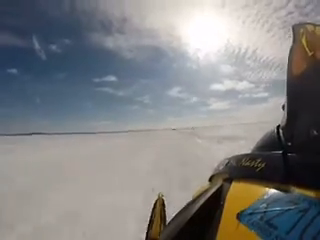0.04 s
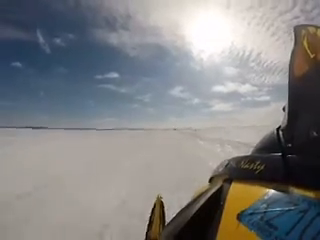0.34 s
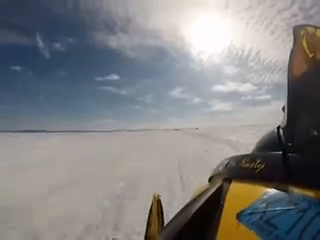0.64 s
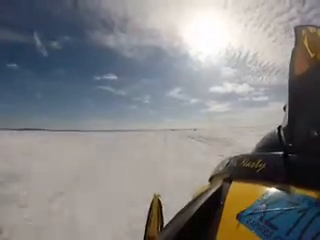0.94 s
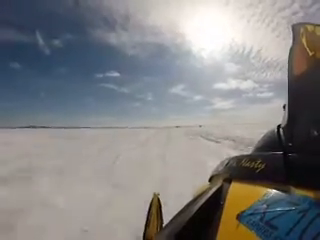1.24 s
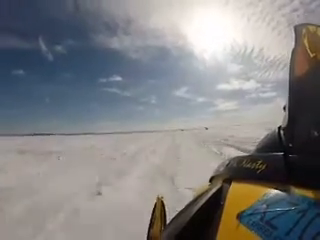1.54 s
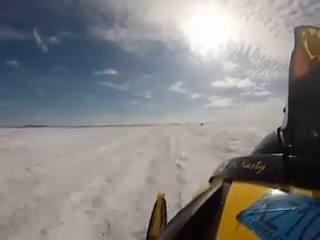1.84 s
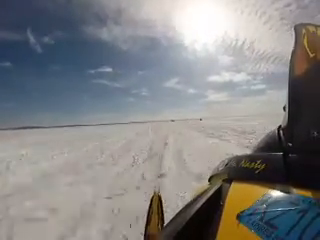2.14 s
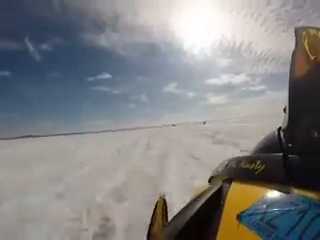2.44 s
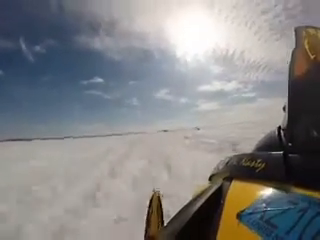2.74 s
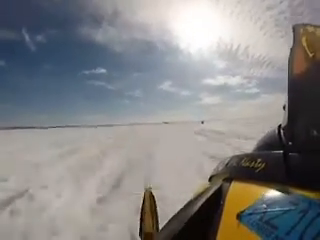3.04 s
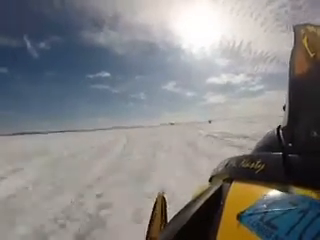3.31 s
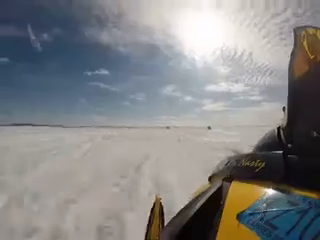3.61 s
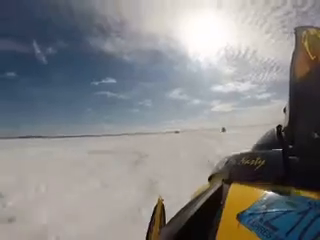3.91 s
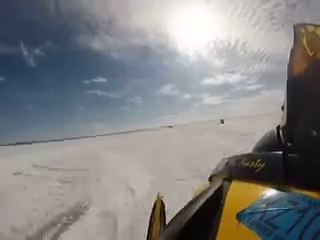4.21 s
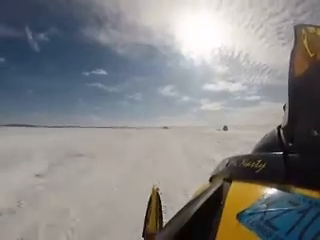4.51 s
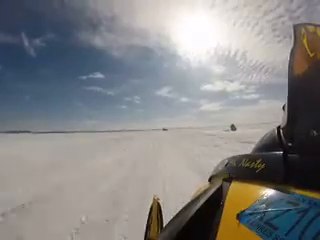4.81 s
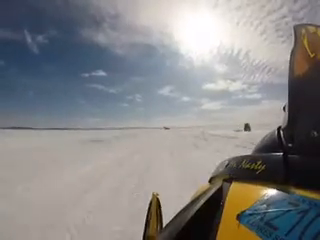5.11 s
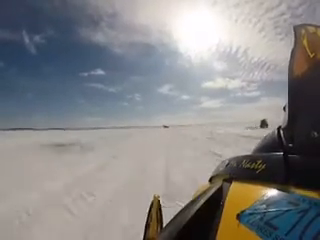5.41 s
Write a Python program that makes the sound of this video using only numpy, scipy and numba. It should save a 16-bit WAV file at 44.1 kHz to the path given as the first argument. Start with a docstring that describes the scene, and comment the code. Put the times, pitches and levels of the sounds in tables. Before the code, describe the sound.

Heard from on board, a fast snowmobile hums steadily through rumbling wind, spraying snow and rattling over drifts.

```python
"""Snowmobile over lake ice

A fast run on snow-covered ice, heard from a cased camera low on the sled's side. The twin-cylinder
engine drones under buffeting wind and beats against the track in the hood. Air rushes and rings in
the case, the skis kick up hissing snow and thud into drifts, ice ticks on the shell, and the mount
clacks over the rough stretches."""
import sys
import numpy as np
from scipy import signal
from scipy.fft import rfft, irfft, next_fast_len
from scipy.io import wavfile
from scipy.ndimage import uniform_filter1d
from numba import njit

SR = 44100
rng = np.random.default_rng(int(sys.argv[2]) if len(sys.argv) > 2 else 0)


def pcm_store(signal):
    """Save signal as 16-bit PCM."""
    levels = np.round(np.clip(np.atleast_2d(signal), -1, 1) * 32767)
    wavfile.write(sys.argv[1], SR, levels.astype(np.int16).T)


N = 249606
TIME = np.arange(N) / SR

# engine speed: time_s, firing_hz
ENGINE_SPEED = [(0.0, 146.4), (0.4, 152.8), (0.85, 144.9), (1.25, 147), (1.53, 149.7), (1.8, 143.3),
                (2.05, 145), (2.3, 141.9), (2.66, 151.1), (2.86, 151.5), (3.1, 147.6), (3.25, 153.4),
                (3.44, 149.1), (3.7, 151.4), (4.15, 147.4), (4.9, 152.3), (5.2, 148.4), (5.66, 134.7)]
# fader ride on the engine drone: time_s, level_db
DRONE_LEVEL = [(0.0, -30), (0.14, -14), (0.32, -25), (0.6, -19.5), (0.88, -22.5), (1.06, -18.8),
               (1.3, -24.5), (1.52, -18.5), (1.85, -22), (2.25, -28.5), (2.62, -20), (2.76, -26),
               (3.15, -25.5), (3.85, -18), (4.15, -25), (4.85, -17), (5.22, -17.5), (5.66, -35)]
# the drone's harmonics: crank_multiple, level_db
DRONE_ORDERS = [(1, -5), (2, 0.5), (3, -17.5), (4, -28.5), (5, -30), (6, -24.5)]
# how hard the hood shakes: time_s, level_db
HOOD_LEVEL = [(0.0, -20), (0.4, -17.5), (0.85, -25), (1.15, -20.5), (1.3, -31), (1.52, -15), (1.75, -23.5),
              (2.2, -21), (3.0, -21.5), (3.55, -26), (3.74, -15.5), (4.22, -26.5), (4.4, -18.5),
              (4.65, -24), (5.4, -19.5), (5.66, -27.0)]
# how far the track's lug rate runs above the third engine order: time_s, lead_hz
LUG_LEAD = [(0.0, 8.53), (0.4, 9.61), (0.75, 5.7), (1.3, 9.46), (1.75, 6.12), (2.05, 7.3), (2.5, 6.01),
            (2.8, 8.9), (3.3, 10.68), (3.7, 8.0), (4.0, 11.44), (4.35, 8.67), (5.05, 7.12), (5.3, 10.18),
            (5.66, 6.98)]
# the hood's broad resonance: frequency_hz, gain_db
HOOD_EQ = [(130, -48.5), (185, -16.5), (208, -2), (222, 2.5), (240, 0.5), (265, -9), (310, -34), (600, -55)]
# wind pressure on the case: time_s, level_db
BUFFET_LEVEL = [(0.0, -24), (0.4, -20), (0.85, -15), (1.05, -20), (1.28, -11), (1.47, -28), (1.6, -15.5),
                (2.3, -13.5), (2.95, -21), (3.15, -17.5), (3.6, -19.6), (4.05, -14.5), (4.28, -25),
                (4.5, -17), (4.8, -25.5), (5.25, -22.5), (5.52, -14), (5.66, -15)]
# deep rumble of the rocking case: frequency_hz, gain_db
BUFFET_EQ = [(12, -44), (25, 0.5), (36, 4.5), (43, 15), (51, 5), (62, -1), (90, -8.5), (200, -55)]
# the skis plough through loose snow: centre_s, length_s, rush_db, spray_db
SNOW_PUFFS = [(0.117, 0.031, -26, -39), (0.182, 0.054, -28.5, -39), (0.434, 0.056, -29.5, -53),
              (0.571, 0.17, -27, -37), (0.709, .04, -25.5, -38), (0.793, 0.025, -30.5, -33),
              (0.994, 0.11, -29.5, -56), (1.117, 0.051, -22.5, -32), (1.25, 0.057, -34.5, -36),
              (1.52, 0.1, -23.5, -38), (1.784, 0.042, -21, -34), (2.064, 0.031, -38, -35),
              (2.207, 0.067, -32.5, -38), (2.489, 0.038, -24.5, -41), (2.673, 0.056, -27, -42),
              (2.872, 0.023, -25.5, -35), (3.074, 0.13, -30.5, -47), (3.324, 0.02, -22, -41),
              (3.643, .05, -26.5, -37), (3.753, 0.15, -32, -50), (3.835, 0.095, -30, -36.5),
              (4.41, 0.044, -29, -39), (4.523, .06, -27, -36), (4.82, 0.17, -28.5, -33),
              (4.985, 0.11, -26.5, -37.5), (5.118, 0.037, -27, -41), (5.221, 0.069, -26, -36),
              (5.405, 0.049, -25, -37), (5.506, 0.12, -29, -41.5)]
# low flapping of the eddies: frequency_hz, gain_db
EDDY_EQ = [(30, -31), (70, -3.5), (125, 3.5), (175, -3.5), (280, -8), (340, -11.5), (430, -18), (560, -20),
           (800, -28), (1300, -19), (3000, -48)]
# hollow ring of the case's cavity: frequency_hz, gain_db
CASE_EQ = [(400, -3), (800, -35.5), (1000, -13), (1200, -3.5), (1530, 2), (1720, -1.5), (1900, -9.5),
           (2300, -13), (2660, -14.5), (2820, -15.5), (3500, -22), (5000, -29.5), (9000, -43)]
# hiss of flying snow: frequency_hz, gain_db
SPRAY_EQ = [(1500, 0.5), (2900, 7.5), (3700, -4.5), (4300, 0), (4900, 3.5), (5600, 0), (6250, 5),
            (7000, -6.5), (8000, -11.5), (9600, -12.5), (11200, -25), (12800, -29), (14500, -44),
            (16000, -49.5)]
# sheen of the gliding skis: frequency_hz, gain_db
GLIDE_EQ = [(1500, -15), (4000, -8.5), (6200, 0.5), (7500, -13), (9600, -8), (11000, -31), (12800, -29.5),
            (14000, -39)]
# the mount knocks in its play: start_s, peak_db, upper_modes_db
MOUNT_KNOCKS = [(0.0983, -14.5, 8), (0.4987, -7.5, -13), (0.597, -7.5, -5.5), (0.612, -13, 2),
                (1.021, -16.5, -5), (1.2458, -14.5, -4), (1.2893, -16.5, 5), (1.3507, -13.5, -8),
                (1.5769, -15.5, -2), (1.7954, -18, -3), (2.203, -18, -15), (2.2559, -19, 10),
                (2.2909, -20.5, 6), (2.3243, -6.5, -9), (2.3612, -8, -5.5), (2.5737, -9.5, -9.5),
                (2.5999, -13, -4), (2.6066, -9.5, -8), (2.8277, -10, -5), (2.8347, -15.5, 2),
                (3.0637, -15.5, -11), (3.1343, -8.5, -4.5), (3.1615, -15, -8), (3.4049, -12.5, 3),
                (3.451, -16, 9), (3.7644, -4.5, -5.5), (3.871, -1.5, -7.5), (3.9113, -3.5, -13.5),
                (3.9447, -9, -9), (4.033, -18, 9)]
# the mount's ringing modes: pitch_hz, level_db, t60_s
MOUNT_RING = [(1550, -2.5, 0.013), (2265, 1.5, 0.012), (2330, -13, 0.03), (2890, -15, 0.015),
              (3510, -13.5, 0.0081), (4100, -15, 0.0083)]
# the skis hit drifts: start_s, level_db
DRIFT_HITS = [(0.866, -15), (1.114, -13), (1.241, -14), (1.478, -20), (1.763, -23), (2.004, -19),
              (2.203, -14.5), (2.67, -9), (2.751, -17.5), (2.91, -17.5), (3.533, -16.5), (3.695, -12.5),
              (3.715, -10.5), (4.072, -20.5), (4.082, -8.5), (5.106, -25)]
# dull body of a ski slap: frequency_hz, gain_db
THUD_EQ = [(40, -31), (120, -4.5), (240, 5.5), (420, -0.5), (650, -17.5), (1200, -7), (2500, -20.5),
           (8000, -54)]
# chips of ice strike the case: start_s, level_db
CHIP_HITS = [(1.1927, -30), (1.3574, -39), (2.1375, -34), (2.4044, -31), (2.6654, -29), (2.7769, -34),
             (2.8634, -29), (2.9088, -33), (3.0644, -32), (3.178, -33), (3.3109, -30), (3.5324, -33),
             (3.9853, -29), (4.483, -34)]
# the hiss ducks briefly, deepest after a hard jolt: centre_s, length_s, depth_db
LEVEL_DIPS = [(0.04, 0.08, 0.5), (0.26, 0.022, 4), (0.92, 0.049, 2), (1.32, 0.076, 0), (1.668, 0.039, 1.5),
              (2.116, 0.051, 3), (2.728, 0.025, 6), (2.95, 0.051, 2.5), (3.244, 0.042, 4), (4.128, .05, 4),
              (4.246, .06, 3), (4.61, 0.035, 3), (5.591, 0.033, 4)]


def undb(db):
    """Decibels to gain."""
    return 10 ** (np.asarray(db) / 20)


def unit(x):
    """Scale to an rms of one."""
    return x / np.sqrt(np.mean(x ** 2))


def curve(table):
    """An automation lane: straight lines between (time_s, value) points."""
    return np.interp(TIME, *np.transpose(table))


def bell(centre_s, length_s):
    """A smooth swell of height one."""
    return np.exp(-np.minimum(2 * ((TIME - centre_s) / length_s) ** 2, 20))


def colour(x, eq):
    """EQ through (frequency_hz, gain_db) points, rolling off above the last; rms one."""
    hz, db = np.transpose(eq)
    bins = np.maximum(np.arange(N // 2 + 1) * SR / N, 1)
    gain = undb(np.interp(np.log(bins), np.log(hz), db)) * np.minimum(hz[-1] / bins, 1) ** 2
    return unit(irfft(rfft(x) * gain, N))


def walk(rate_hz):
    """A smooth random modulator of rms one, changing about rate_hz times a second."""
    size = next_fast_len(N, True)
    bins = np.arange(size // 2 + 1) * SR / size
    return unit(irfft(rfft(rng.standard_normal(size)) * np.exp(-(bins / rate_hz) ** 2), size)[:N])


def steady(x, window_s):
    """Level out the slow swells of a noise, so that its drive sets the loudness."""
    size = max(int(window_s * SR), 2)
    return x / np.sqrt(uniform_filter1d(uniform_filter1d(x ** 2, size), size) + 1e-9)


def add(track, start_s, sound):
    """Drop a one-shot onto a track."""
    start = max(int(start_s * SR), 0)
    track[start:start + len(sound)] += sound[:N - start]


def engine(flutter=0.0052, waver_db=0.6, sway_db=1.63, gain_db=-1):
    """Drone and crank angle: two firings a turn, odd orders from unequal cylinders, wavering in wind."""
    crank_hz = curve(ENGINE_SPEED) / 2 * (1 + flutter * walk(22.2))
    crank = 2 * np.pi * np.cumsum(crank_hz) / SR
    drone = sum(undb(db + waver_db * walk(5.6)) * np.sin(order * crank + rng.uniform(0, 2 * np.pi))
                for order, db in DRONE_ORDERS)
    return np.sqrt(2) * drone * undb(curve(DRONE_LEVEL) + gain_db + sway_db * walk(3.4)), crank


def hood(crank, order_db=-4.0, lug_db=-5.5, shake_db=-5.0, lag_rad=0.32, sway_db=0.95):
    """The third engine order and the track lugs drive the hood's resonance; their beat makes it throb."""
    angle = 3 * crank + 0.6 * walk(9)  # the flexing hood lags its drive by a wandering angle
    beat = 2 * np.pi * np.cumsum(curve(LUG_LEAD)) / SR
    third_order = undb(order_db) * np.sin(angle)
    lugs = undb(lug_db) * np.sin(angle + beat + lag_rad * walk(36))
    shake = undb(shake_db) * steady(colour(rng.standard_normal(N), HOOD_EQ), window_s=0.072)
    return (np.sqrt(2) * (third_order + lugs) + shake) * undb(curve(HOOD_LEVEL) + sway_db * walk(11))


def wind_buffet(flutter_db=1.06):
    """The low end: wind pressure rocks the case in uneven shoves."""
    rumble = steady(colour(rng.standard_normal(N), BUFFET_EQ), window_s=0.12)
    return rumble * undb(curve(BUFFET_LEVEL) + flutter_db * walk(17))


def slipstream(rush_bed_db=-28.5, spray_bed_db=-40, wander_hz=14):
    """Fader rides in dB for air rush and snow spray: a restless bed, swelling with each puff."""
    rush = undb(rush_bed_db + walk(wander_hz))
    spray = undb(spray_bed_db + 1.6 * walk(wander_hz))
    for centre_s, length_s, rush_db, spray_db in SNOW_PUFFS:
        swell = bell(centre_s, length_s)
        rush = np.hypot(rush, undb(rush_db) * swell)
        spray = np.hypot(spray, undb(spray_db) * swell)
    return 20 * np.log10(rush), 20 * np.log10(spray)


def airflow(rush_db, gust, crank, eddy_db=-21.5, eddy_follow=0.91, case_db=-1.5, throb=0.12):
    """Eddies tear off the case: a low flapping, and short bursts that ring its cavity near 1.5 kHz."""
    eddies = colour(rng.standard_normal(N) * undb(1.5 * gust), EDDY_EQ)
    flapping = eddies * undb(eddy_db + eddy_follow * (rush_db - rush_db.mean()))
    bursts = undb(2 * gust + 2 * walk(270)) * (1 + throb * np.cos(2 * crank))
    cavity = steady(colour(rng.standard_normal(N) * bursts, CASE_EQ), window_s=0.21)
    return flapping + cavity * undb(rush_db + case_db)


def snow_spray(spray_db, gust, gain_db=-5.0, gust_db=1.36, burst_db=4.0,
               grains_per_s=700, scatter_db=3.5, grain_s=0.00024, grain_db=-3, glide_db=-55):
    """Powder hisses past in puffs, coarser grains tick on the case, and the skis glide underneath."""
    sizes = undb(scatter_db * np.minimum(rng.exponential(size=N), 6))
    strikes = (rng.random(N) < grains_per_s / SR) * sizes
    ticks = signal.lfilter([1], [1, -np.exp(-1 / (grain_s * SR))], strikes) * rng.standard_normal(N)
    powder = rng.standard_normal(N) * undb(burst_db * walk(280))
    snow = (unit(powder) + undb(grain_db) * unit(ticks)) * undb(gust_db * gust)
    glide = colour(rng.standard_normal(N) * undb(1.3 * walk(200)), GLIDE_EQ)
    return colour(snow, SPRAY_EQ) * undb(spray_db + gain_db) + glide * undb(glide_db)


def ice_crystals(count=260, level_db=-47, scatter_db=3, low_hz=2600, high_hz=10000, ring_s=0.00054):
    """Lone crystals ping off the case, each at its own pitch; the small, high ones are fainter."""
    out, t = np.zeros(N), np.arange(SR // 150) / SR
    for when, pitch, size in rng.random((count, 3)):
        hz = low_hz * (high_hz / low_hz) ** pitch
        tilt_db = -6 * np.log2(hz / high_hz)
        db = level_db + tilt_db + scatter_db * min(-np.log(1 - size), 4)
        envelope = (1 - np.exp(-t * hz)) * np.exp(-t / ring_s)
        add(out, when * N / SR, undb(db) * np.sin(2 * np.pi * hz * t) * envelope)
    return out


def mount_clacks(bright_db=1, contact_s=0.00048, rebound=0.2, rebound_s=0.0043):
    """Each knock swells while the plastic gives, rings the mount briefly and rebounds once."""
    out, t = np.zeros(N), np.arange(SR // 25) / SR
    hz, mode_db, t60_s = np.transpose(MOUNT_RING)[:, :, None]
    envelopes = (1 - np.exp(-t / contact_s)) ** 2 * np.exp(-np.log(1000) * t / t60_s)
    for start_s, peak_db, upper_db in MOUNT_KNOCKS:
        gains = undb(mode_db + (hz > hz[0]) * (upper_db + bright_db))
        # the point of contact shifts, and with it each mode's pitch and phase
        detune, phase = rng.standard_normal((2, len(hz), 1))
        angle = 2 * np.pi * (hz * (1 + 0.025 * detune) * t + phase)
        ring = np.sum(gains * envelopes * np.sin(angle), axis=0)
        knock = ring / np.abs(ring).max() * undb(peak_db)
        add(out, start_s, knock)
        add(out, start_s + rebound_s, rebound * knock)
    return out


def ski_bumps(rise_s=0.0047, slap_db=-7.0, snow_db=-17, chassis_hz=215, ring_s=0.015, ring_db=3):
    """A ski slaps a drift: a dull thud and a puff of snow, while the chassis rings for a few cycles."""
    force, ring, t = np.zeros(N), np.zeros(N), np.arange(SR // 8) / SR
    slap = t / rise_s * np.exp(1 - t / rise_s)
    chassis = np.sin(2 * np.pi * chassis_hz * t) * np.exp(-t / ring_s)
    for start_s, db in DRIFT_HITS:
        add(force, start_s - rise_s / 2, undb(db + slap_db) * slap)
        add(ring, start_s, undb(db + ring_db) * chassis)
    thud = colour(rng.standard_normal(N), THUD_EQ)
    snow = undb(snow_db) * colour(rng.standard_normal(N), SPRAY_EQ)
    return ring + force * (thud + snow)


def ice_chips(gain_db=-4, decay_s=0.0014):
    """A chip of ice cracks on the case: a bright tick of a millisecond or two."""
    force, t = np.zeros(N), np.arange(SR // 50) / SR
    for start_s, db in CHIP_HITS:
        add(force, start_s, undb(db + gain_db) * np.exp(-t / decay_s))
    tick_eq = [(1500, -24), (3500, -4), (6200, 7), (9600, -13), (13000, -20), (15000, -29)]
    return force * colour(rng.standard_normal(N), tick_eq)


def scene(low_dip_share=0.33):
    """A dry mono mix, as open ice gives no echo: hits over a bed whose lows duck less than its hiss."""
    rush_db, spray_db = slipstream()
    drone, crank = engine()
    gust = walk(63)  # one turbulence flutters the air and the snow together
    lows = drone + hood(crank) + wind_buffet()
    hiss = airflow(rush_db, gust, crank) + snow_spray(spray_db, gust) + ice_crystals()
    dip_db = -sum(depth_db * bell(centre_s, length_s) for centre_s, length_s, depth_db in LEVEL_DIPS)
    bed = lows * undb(low_dip_share * dip_db) + hiss * undb(dip_db)
    return (bed + mount_clacks() + ski_bumps() + ice_chips())[None, :]


@njit
def peak_hold(x, keep):
    """Peak follower: instant attack, then a release by the factor keep every sample."""
    out, held = np.empty(len(x)), 0.
    for i in range(len(x)):
        held = max(abs(x[i]), held * keep)
        out[i] = held
    return out


def record(dry, limit_db=-3.5, release_s=0.13, top_hz=15300):
    """The camera's limiter holds down the highest peaks and recovers; a steep low-pass cuts the top."""
    peak = uniform_filter1d(peak_hold(dry[0], np.exp(-1 / (release_s * SR))), size=64)
    limited = dry / np.maximum(peak / undb(limit_db), 1)
    return signal.sosfilt(signal.ellip(8, 0.2, 70, top_hz, fs=SR, output="sos"), limited)


dry = scene()
out = record(dry)
pcm_store(out)
```